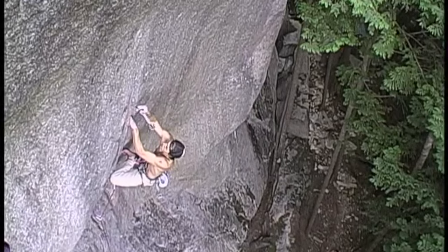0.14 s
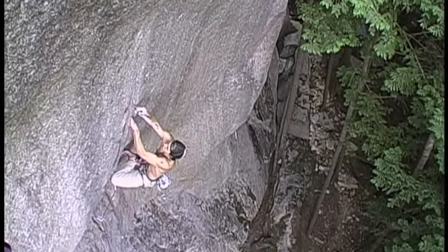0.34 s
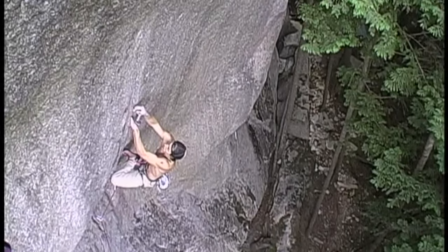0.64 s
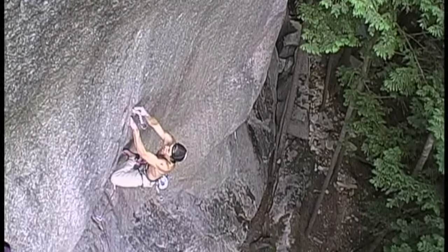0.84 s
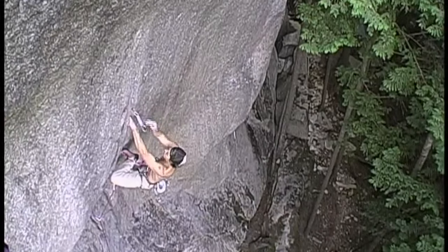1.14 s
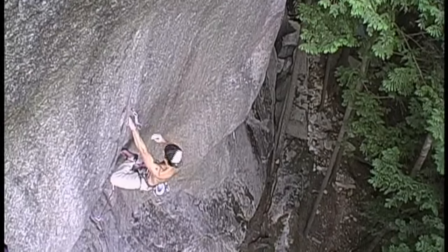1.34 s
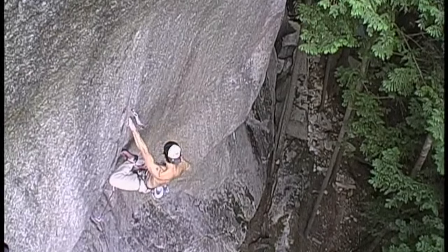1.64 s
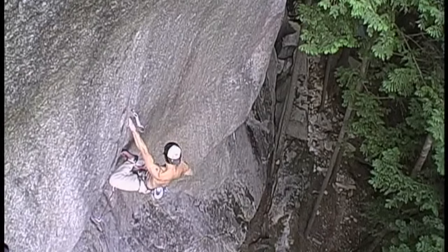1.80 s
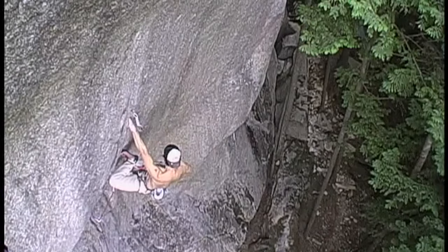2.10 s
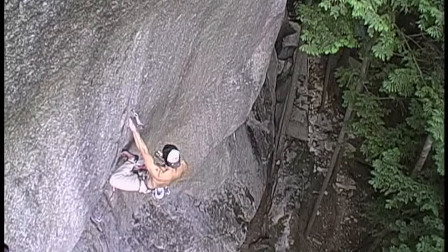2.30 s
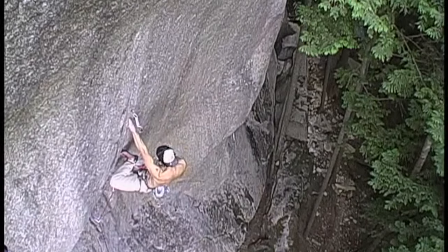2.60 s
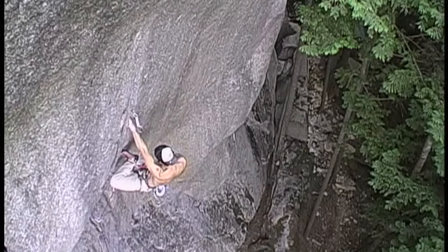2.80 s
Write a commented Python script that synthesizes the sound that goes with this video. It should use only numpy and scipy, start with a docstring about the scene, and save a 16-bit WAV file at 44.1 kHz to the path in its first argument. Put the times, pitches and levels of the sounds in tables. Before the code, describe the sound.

A carabiner's hard, loud snap stands out after quiet gritty scuffs and light metal clinks; its short echo scatters across a cliff and forest, with faint airy rush and a thin high whistle, gear close to the microphone.

```python
"""Metal gear on a climber's harness ticks, clinks and scuffs, and a carabiner gate snaps shut above a forest.
Each piece rings as a set of dying modes with a grating noise; the snap layers notes, click, buzz and
a low overload thump. Scattered noise tails echo the gear off the rock and, later and duller, off the trees.
Behind lie a soft distant rush of shaped noise, a faint whine of wavering tones, a narrow hiss
and a thin high whistle, perhaps a bird, made of a sagging, slightly rough sine."""
import sys
import numpy as np
from scipy import signal
from scipy.fft import rfft, irfft
from scipy.io import wavfile

SR = 44100
rng = np.random.default_rng(int(sys.argv[2]) if len(sys.argv) > 2 else 0)


def store_wav(level_fs):
    """Save 16-bit WAV to argv[1]."""
    pcm = np.round(np.clip(np.atleast_2d(level_fs), -1, 1) * 32767)
    wavfile.write(sys.argv[1], SR, pcm.T.astype(np.int16))


N = 130095
TIME = np.arange(N) / SR
FREQS = np.maximum(np.fft.rfftfreq(N, 1 / SR), 1)

# spectrum of the distant rush: f/Hz, relative density/dB
RUSH_SPECTRUM = [(15, -65), (25, -37), (102, -5.5), (161, -3), (624, -7), (1480, -2), (1790, -5.5),
                 (2910, -9), (3160, -12), (3820, -10.5), (5730, -18.5), (8590, -18.5), (14400, -27),
                 (16000, -54)]
# level curve of the whole background, with a brief dip: t/s, level/dB
BACKGROUND_LEVEL = [(0, 0), (1.63, 0), (2.13, -5), (2.25, -7), (2.5, 0.5), (2.95, 0)]
# how alike the rush is on the two sides: f/Hz, coherence/1
RUSH_LIKENESS = [(150, 0.96), (300, 0.53), (700, 0.65), (1300, 0.54), (3500, 0.31), (14000, .1)]
# how far the left side of the rush leads: f/Hz, phase/rad
RUSH_LEAD = [(50, 1.5), (250, -1), (430, -2.5), (850, -4), (1300, -5), (3500, -5.5)]
# left level minus right level of the rush: f/Hz, difference/dB
RUSH_BALANCE = [(60, -2.5), (250, 6.5), (600, 3), (1500, 0)]
# steady tones of the whine: f/Hz, level/dB
WHINE_TONES = [(1499, -72.5), (1799, -77.5), (2099, -73.5), (2398, -73.5), (2998, -74), (3297, -75)]
# whistled notes: onset t/s, length/s, level/dB
WHISTLE_NOTES = [(0.29, .19, -62), (1.86, .17, -65), (2.9, 0.15, -65)]
# the snap as it carries to rock and trees: f/Hz, level/dB
SNAP_ECHO_SPECTRUM = [(1500, -16), (2350, 3), (3000, 0), (5000, 10.5), (7400, 3), (9000, 5), (13200, 0),
                      (14500, -18)]
# swells of gear shifting against rock: peak t/s, rise and fall time constant/s, level/dB
SCUFF_SWELLS = [(0.035, .002, -53.5), (0.102, 0.0019, -52.5), (0.176, 0.0016, -55), (0.396, 0.0089, -57),
                (0.409, 0.003, -50.5), (0.478, 0.017, -51), (0.599, 0.0044, -52), (0.622, 0.017, -57),
                (0.74, 0.0081, -48), (2.822, 0.0034, -51.5)]
# colour of the scuffs: f/Hz, relative density/dB
SCUFF_SPECTRUM = [(800, -16), (2000, 0), (3000, 3.5), (5200, -6), (6900, 1.5), (9300, -7), (16000, -23)]

# contacts of each piece of gear: t/s, relative level/dB, brightness tilt/(dB per octave)
RACK_CONTACTS = [(0.479, -42, -8), (0.7243, -32.5, -5), (0.7298, -33, 2), (0.7333, -32.5, 0),
                 (0.737, -38.5, 4)]
CAM_CONTACTS = [(1.698, -45.5, 0), (1.716, -48, 2), (1.749, -30.5, 0), (1.754, -38.5, -0.24)]
LATCH_CONTACTS = [(1.9035, -45, -4), (1.9742, -33.5, 0), (2.0238, -27.5, -0.5)]
CARABINER_CONTACTS = [(2.1556, -18.5, -0.15), (2.1582, -20.5, -2.4)]
RING_CONTACTS = [(2.5465, -40, 0)]
CLIP_CONTACTS = [(2.6557, -33.5, -1.6), (2.6648, -33.5, 0), (2.6665, -28.5, 0)]
# what each piece rings with: f/Hz, relative level/dB, t60/s
RACK_MODES = [(2950, -3.5, .017), (3500, -5, 0.012), (6270, -2, .016), (6750, -1.5, 0.021),
              (7840, -5.5, 0.017), (11900, -12.5, .02)]
CAM_MODES = [(4710, -11, 0.025), (5390, -15, .025), (6970, -1, .028), (9250, -4.5, .022), (11600, -12, .03)]
LATCH_MODES = [(4250, -7, .014), (5150, 1, .009), (6650, -6, .012), (9600, -2, .011), (13250, -18, .025)]
CARABINER_MODES = [(2340, -6, 0.015), (4120, -4.5, 0.016), (4470, -9.5, 0.016), (5070, -1, 0.015),
                   (5450, -0.5, .022), (7330, -6, 0.019), (8600, -8.5, 0.034), (9310, -10, 0.021),
                   (10420, -12, 0.018), (11660, -10, 0.014), (13250, -15, 0.021)]
RING_MODES = [(2440, 2.5, 0.03), (7900, -4, .02), (9430, -3.5, 0.022)]
CLIP_MODES = [(1730, -9, 0.036), (2520, -11, .02), (4380, -10, .035), (5590, -11, 0.018), (7720, -6, .02),
              (9400, -4.5, .018), (13400, -12, .014)]
# hard notes of the gate landing: f/Hz, relative level/dB, width/Hz (wider is shorter)
GATE_TONES = [(5100, 0, 1100), (8300, -11, 1100), (11400, -19, 1100)]

HISS_HZ, HISS_WIDTH_HZ, HISS_DB = 8600, 470, -77
RUSH_DB = -57  # rms of the two sides averaged, ahead of the background level curve
WHISTLE_HZ, WHISTLE_SAG_HZ_PER_S, WHISTLE_WAVER_HZ = 8010, 300, 40
WHISTLE_ATTACK_S, WHISTLE_RELEASE_S = 0.022, 0.12
ROCK_DELAY_S, ROCK_T60_S, ROCK_DB = 0.016, 0.33, -15.5
FOREST_DELAY_S, FOREST_T60_S, FOREST_DB = 0.094, 0.77, -19.5
ECHO_LIKENESS = 0.5  # correlation between the sides of the echo
GEAR_ECHO_DB = -10  # how much gear is sent to the echoes
GRAINS_PER_S = 2400
CHATTER_T60_S = 0.016
GATE_S, GATE_DB = 2.1553, -10
THUMP_DB, THUMP_HZ = -49, 260
GEAR_PAN_DB = 0.86  # raises the left and lowers the right
TINY = 1e-18  # inaudible offset that keeps filters off vanishingly small numbers


def from_db(db):
    """Decibels to gain."""
    return 10 ** (np.asarray(db) / 20)


def rms_one(x):
    """Scale to unit rms."""
    return x / np.sqrt(np.mean(x ** 2) + 1e-20)


def at_hz(points):
    """Read a table on a log-frequency axis."""
    hz, value = np.transpose(points)
    return np.interp(np.log(FREQS), np.log(hz), value)


def dying(t, t60):
    """Exponential decay that starts at t = 0 and falls 60 dB in t60."""
    return (t >= 0) * np.exp(-np.log(1000) * np.maximum(t, 0) / t60)


def drift(rate_hz):
    """Random wander of spread 1, made of noise that falls away above rate_hz."""
    noise = rfft(rng.standard_normal(N))
    return rms_one(irfft(noise / (1 + (FREQS / rate_hz) ** 2), N))


def band(x, low_hz, high_hz):
    """Gentle band-pass."""
    edges = [low_hz, min(high_hz, 0.45 * SR)]
    return signal.sosfilt(signal.butter(2, edges, "band", fs=SR, output="sos"), x)


def add(out, s, sound):
    """Mix a sound in at a time."""
    i = int(s * SR)
    out[:, i:i + sound.shape[-1]] += sound[..., :N - i]


def hiss():
    """A faint narrow band of high noise."""
    noise = rng.standard_normal(N)
    narrow = band(noise, HISS_HZ - HISS_WIDTH_HZ / 2, HISS_HZ + HISS_WIDTH_HZ / 2)
    return from_db(HISS_DB) * rms_one(narrow)


def whine(waver_hz=1.48, flutter_db=1.5):
    """Faint steady sines that waver a little in level and pitch."""
    out = np.zeros(N)
    for hz, db in WHINE_TONES:
        level = np.sqrt(2) * from_db(db + flutter_db * drift(11))  # sqrt(2) turns rms into peak
        phase = 2 * np.pi * np.cumsum(hz + waver_hz * drift(8)) / SR
        out += level * np.sin(phase)
    return out


def rush():
    """Far-off air and water noise, partly shared by the two sides, with the phase offset between them."""
    common, own = rfft(rng.standard_normal((2, N)))
    alike = np.clip(at_hz(RUSH_LIKENESS), 0, 1)
    lead = at_hz(RUSH_LEAD)
    right = (alike * common + np.sqrt(1 - alike ** 2) * own) * np.exp(-1j * lead)
    pan = from_db(at_hz(RUSH_BALANCE) / 2)
    # make up for the part that cancels when the sides are summed
    colour = from_db(at_hz(RUSH_SPECTRUM)) / np.sqrt(1 + alike * np.cos(lead))
    pair = irfft(colour * np.array([common * pan, right / pan]), N)
    return from_db(RUSH_DB) * pair / pair.mean(axis=0).std()


def whistles(flutter_db=1.6):
    """A thin, slightly rough sine starts quickly, then sags in pitch and fades."""
    out = np.zeros(N)
    for s, length, db in WHISTLE_NOTES:
        t = TIME - s
        level = np.clip(np.minimum(t / WHISTLE_ATTACK_S, (length - t) / WHISTLE_RELEASE_S), 0, 1)
        hz = WHISTLE_HZ - WHISTLE_SAG_HZ_PER_S * t + WHISTLE_WAVER_HZ * drift(110)
        flutter = from_db(db + flutter_db * drift(40))
        out += level * flutter * np.sin(2 * np.pi * np.cumsum(hz) / SR)
    return out


def scatter(delay, t60, db, high_hz):
    """Impulse response of a rough surface: delayed, dying noise, partly alike on the two sides."""
    mid, side = rng.standard_normal((2, SR))
    opposed = side * np.array([[1], [-1]])
    noise = np.sqrt(1 + ECHO_LIKENESS) * mid + np.sqrt(1 - ECHO_LIKENESS) * opposed
    response = rms_one(noise * dying(TIME[:SR] - delay, t60)) / np.sqrt(SR)  # unit energy
    return from_db(db) * band(response, 500, high_hz)


def echoes(x):
    """Rough rock scatters the sound back early; the trees answer later and duller."""
    rock = scatter(ROCK_DELAY_S, ROCK_T60_S, ROCK_DB, high_hz=16000)
    forest = scatter(FOREST_DELAY_S, FOREST_T60_S, FOREST_DB, high_hz=7550)
    mono = x.mean(axis=0)[None]
    return signal.fftconvolve(mono, rock + forest, axes=1)[:, :N]


def thrown_snap():
    """The gate's snap as it spreads towards rock and trees: one broad, bright pulse."""
    pulse = signal.unit_impulse(N, int(GATE_S * SR))
    return irfft(rfft(pulse) * from_db(at_hz(SNAP_ECHO_SPECTRUM)), N)


def scuffs():
    """Gear grates on rock: dense tiny random grains, coloured, under short swells."""
    level = sum(from_db(db) * np.exp(-np.abs(TIME - s) / length) for s, length, db in SCUFF_SWELLS)
    happens = rng.random(N) < GRAINS_PER_S / SR
    size = rng.standard_normal(N) + 0.5 * rng.standard_normal((2, N))
    grit = irfft(rfft(happens * size) * from_db(at_hz(SCUFF_SPECTRUM)), N)
    return level * rms_one(grit)


def struck(contacts, modes, chatter_db, low_hz, high_hz, spread=0.49):
    """Each contact rings the piece's modes and grates briefly; high modes differ most between the sides."""
    out, t = np.zeros((2, N)), TIME[:SR // 8]
    hz, mode_db, t60 = np.transpose(modes)[:, :, None]
    pitch = hz / hz.mean()
    for s, db, tilt_db in contacts:
        phase = rng.uniform(0, 2 * np.pi, hz.shape)
        phase = phase + spread * pitch * rng.standard_normal((2, len(hz), 1))
        gain = from_db(mode_db + tilt_db * np.log2(pitch))
        rise = np.minimum(t * hz, 1)  # each mode builds up over one cycle
        ring = (gain * rise * dying(t, t60) * np.sin(2 * np.pi * hz * t + phase)).sum(axis=1)
        grit = rng.standard_normal(len(t)) + spread * rng.standard_normal((2, len(t)))
        chatter = band(grit * dying(t, CHATTER_T60_S), low_hz, high_hz)
        add(out, s, from_db(db) * (ring / 2 + from_db(chatter_db) * chatter))
    return band(out + TINY, low_hz / 2, high_hz=14300)


def thump(t60=0.024):
    """A faint low thump under the snap, as from overload: a dying push through a low-pass."""
    push = dying(TIME - GATE_S, t60) + TINY
    return from_db(THUMP_DB) * signal.sosfilt(signal.butter(2, THUMP_HZ, fs=SR, output="sos"), push)


def spray(db=-14, t60=0.0085, low_hz=7000, high_hz=11000):
    """The gate buzzes brightly on its seat: dying noise, different on each side."""
    buzz = rng.standard_normal((2, N)) * dying(TIME - GATE_S, t60)
    return from_db(db) * band(buzz + TINY, low_hz, high_hz)


def crack(db=-11, low_hz=3000, high_hz=12200):
    """The sharp, broad edge of the gate's impact: a filtered click."""
    out = np.zeros((2, N))
    click = band(signal.unit_impulse(SR // 20), low_hz, high_hz)
    add(out, GATE_S, from_db(db) * click)
    return signal.sosfilt(signal.butter(2, 2100, "high", fs=SR, output="sos"), out + TINY)


def gate():
    """The sprung gate lands with hard notes a few cycles long."""
    out, t = np.zeros((2, N)), TIME[:SR // 20]
    for hz, db, width_hz in GATE_TONES:
        age = np.pi * width_hz * t
        swell = age * np.exp(1 - age)  # peaks at 1
        add(out, GATE_S, from_db(GATE_DB + db) * swell * np.cos(2 * np.pi * hz * t))
    return out


def scene():
    """Gear, the gate's snap and their echoes over the background."""
    background = rush() + whine() + hiss()
    background = background * from_db(np.interp(TIME, *np.transpose(BACKGROUND_LEVEL)))

    gear = scuffs()
    gear += struck(RACK_CONTACTS, RACK_MODES, chatter_db=-2, low_hz=1550, high_hz=8700)
    gear += struck(CAM_CONTACTS, CAM_MODES, chatter_db=-6, low_hz=3500, high_hz=10000)
    gear += struck(LATCH_CONTACTS, LATCH_MODES, chatter_db=-6.5, low_hz=3300, high_hz=10200)
    gear += struck(CARABINER_CONTACTS, CARABINER_MODES, chatter_db=-3.5, low_hz=3640, high_hz=10200)
    gear += struck(RING_CONTACTS, RING_MODES, chatter_db=-8, low_hz=2200, high_hz=11000)
    gear += struck(CLIP_CONTACTS, CLIP_MODES, chatter_db=-3.5, low_hz=1400, high_hz=8850)

    snap = gate() + crack() + spray() + thump()
    direct = (gear + snap) * from_db([[GEAR_PAN_DB], [-GEAR_PAN_DB]])
    echo = echoes(from_db(GEAR_ECHO_DB) * gear + thrown_snap())
    return direct + echo + background + whistles()


def record(dry):
    """A steep low-pass takes off the top: 60 dB down from 16.5 kHz up."""
    return signal.sosfilt(signal.cheby2(16, 60, 16500, fs=SR, output="sos"), dry)


dry = scene()
out = record(dry)
store_wav(out)
```